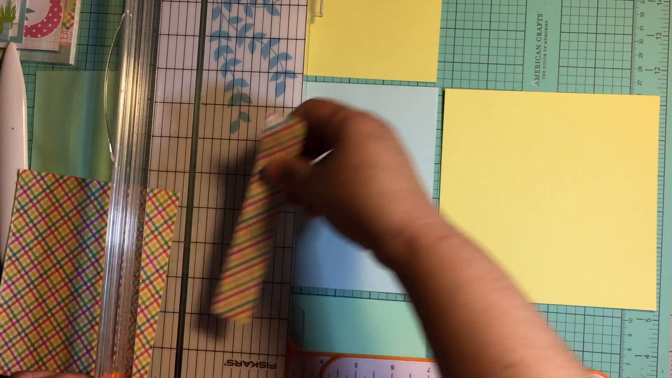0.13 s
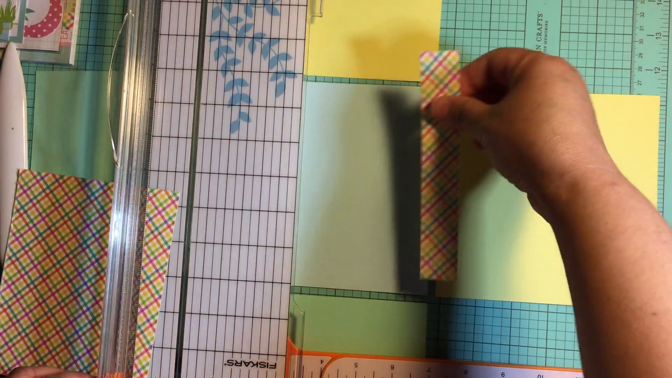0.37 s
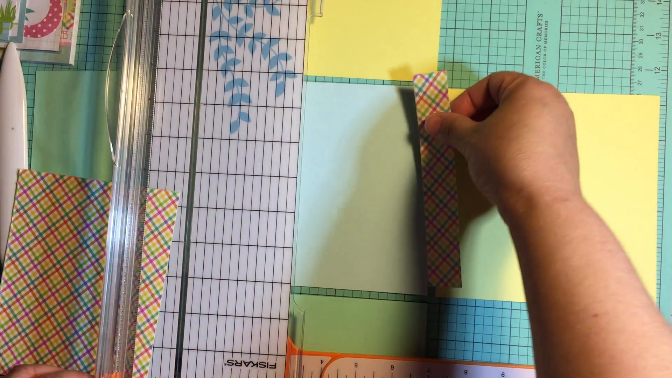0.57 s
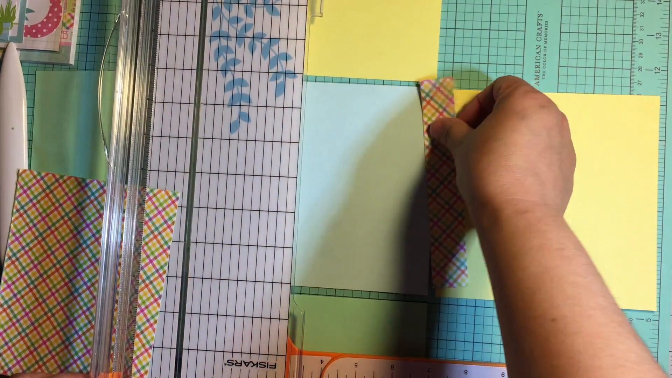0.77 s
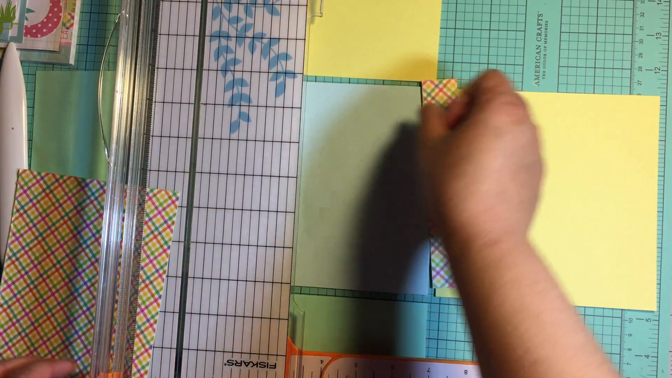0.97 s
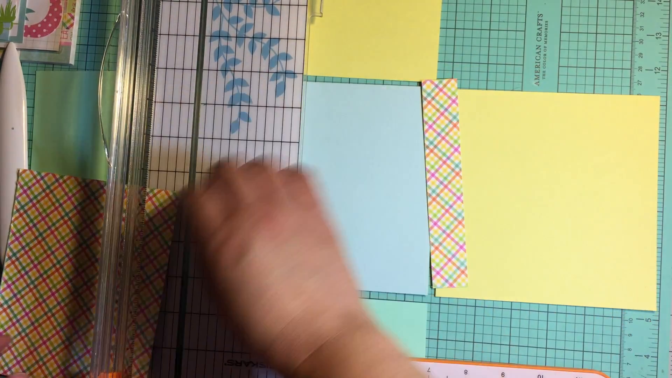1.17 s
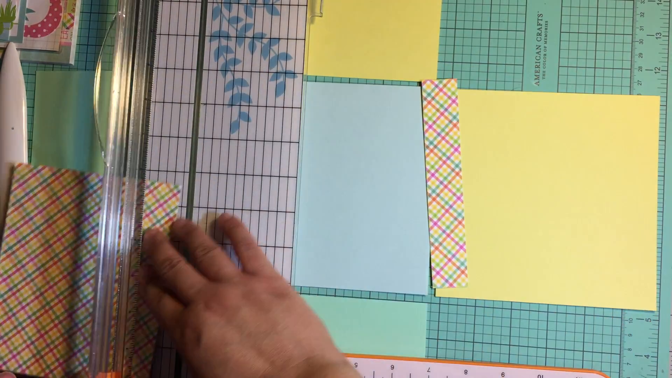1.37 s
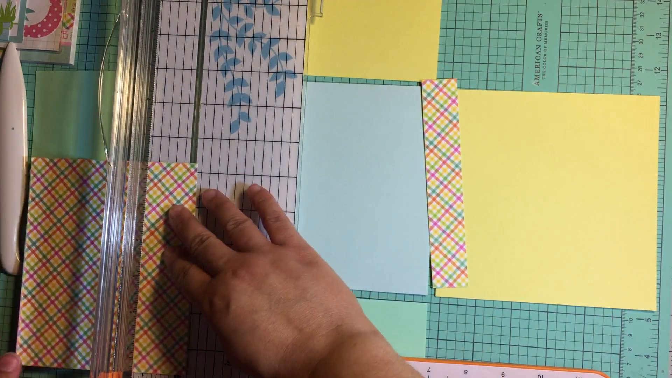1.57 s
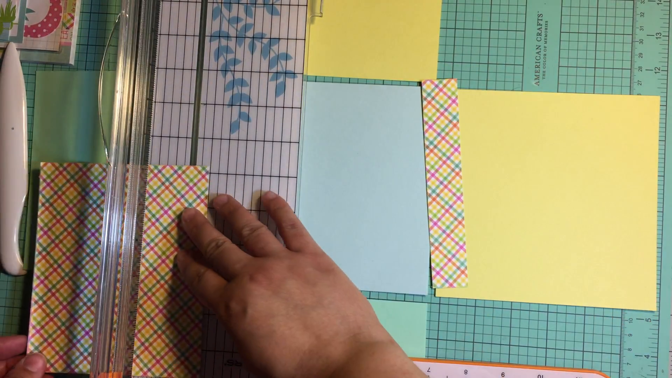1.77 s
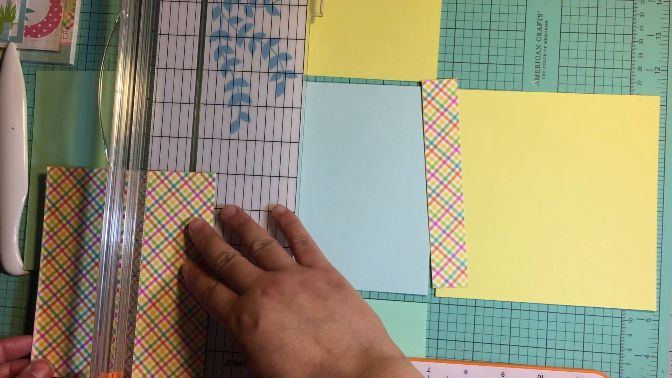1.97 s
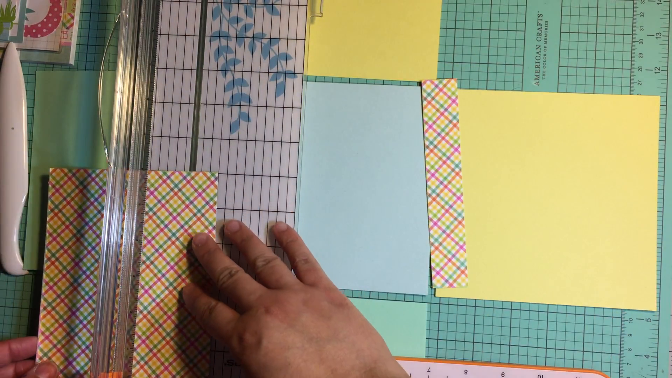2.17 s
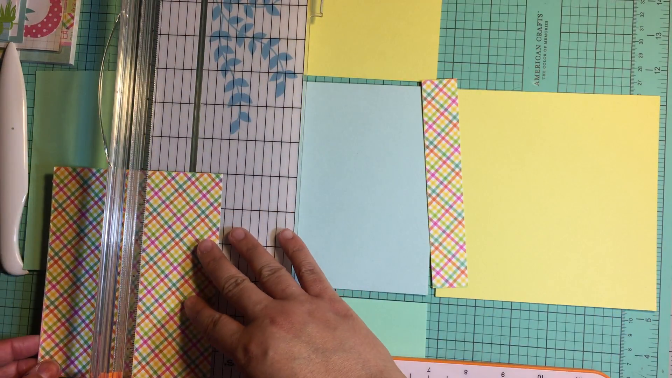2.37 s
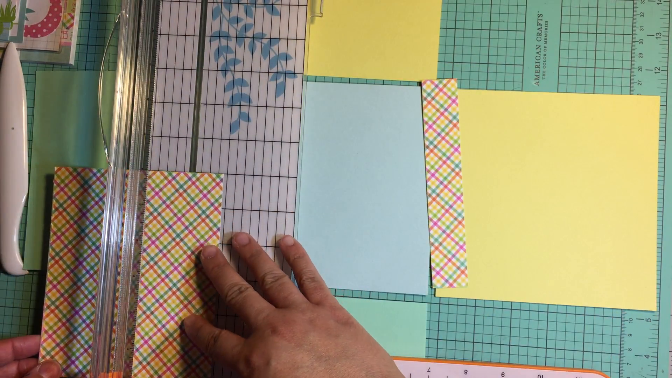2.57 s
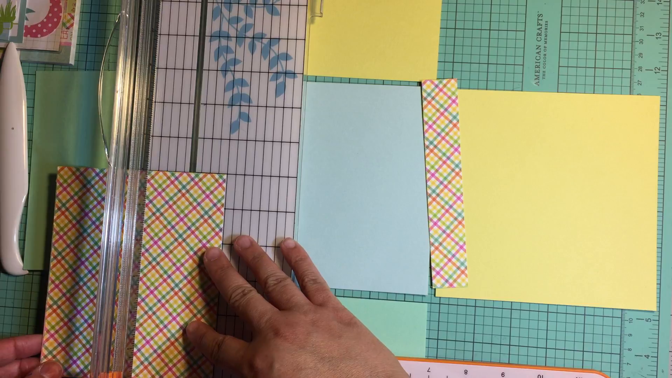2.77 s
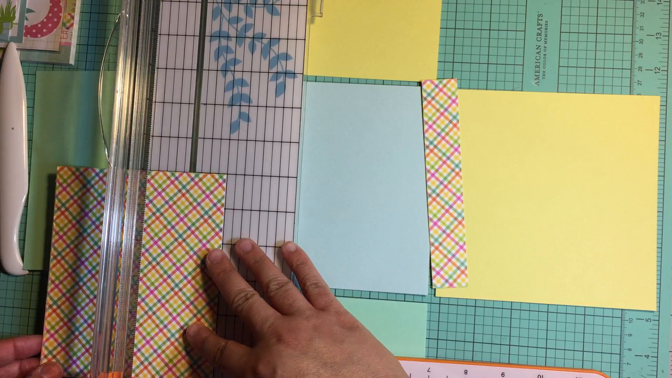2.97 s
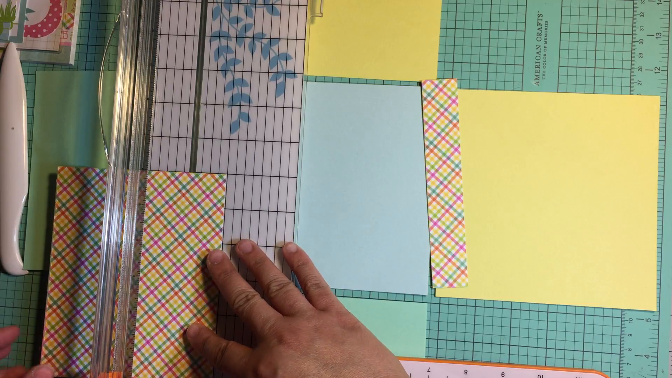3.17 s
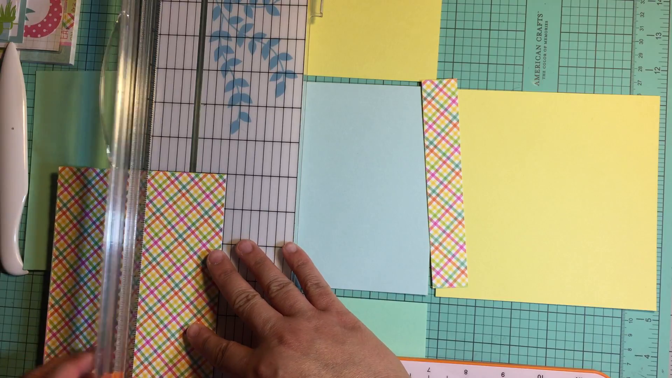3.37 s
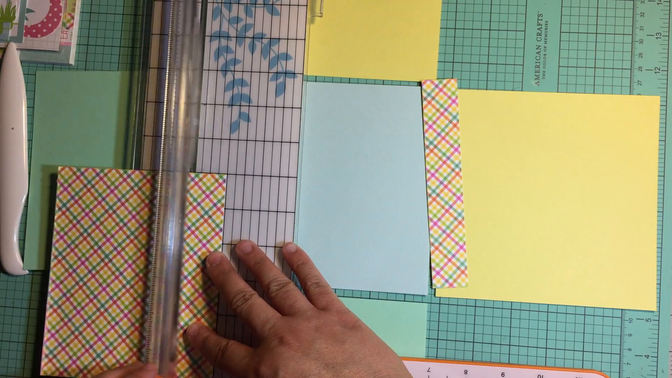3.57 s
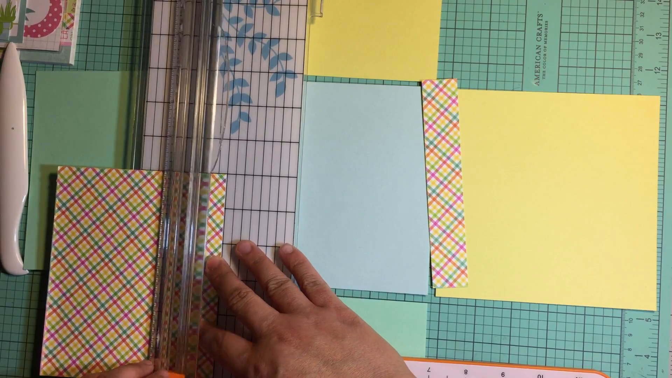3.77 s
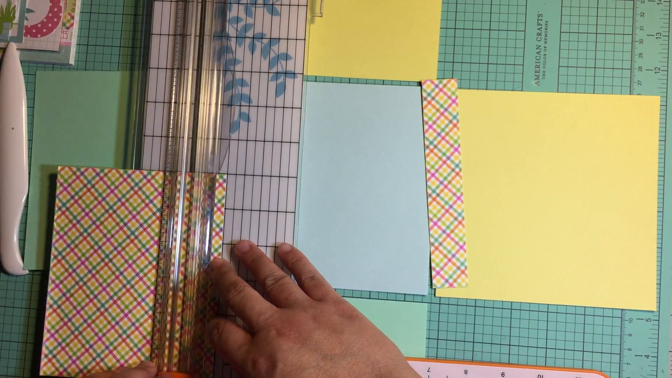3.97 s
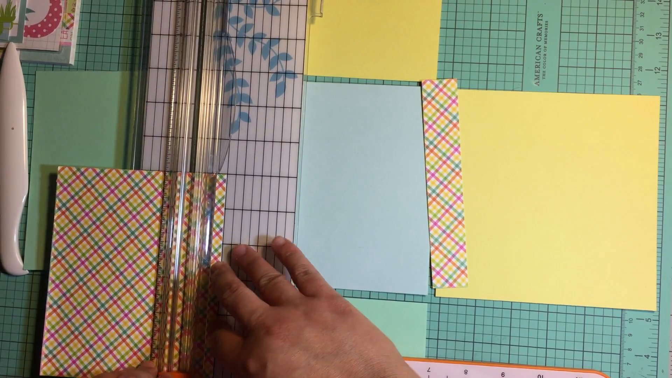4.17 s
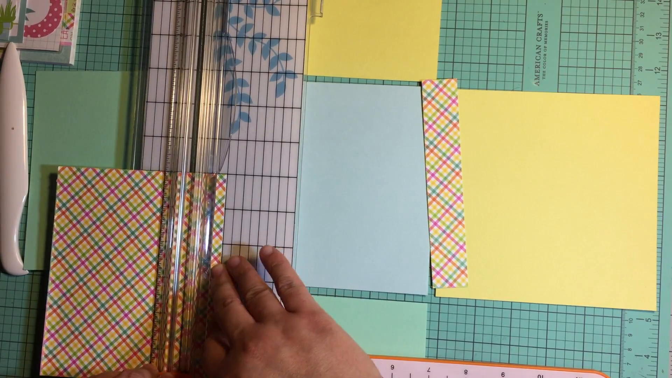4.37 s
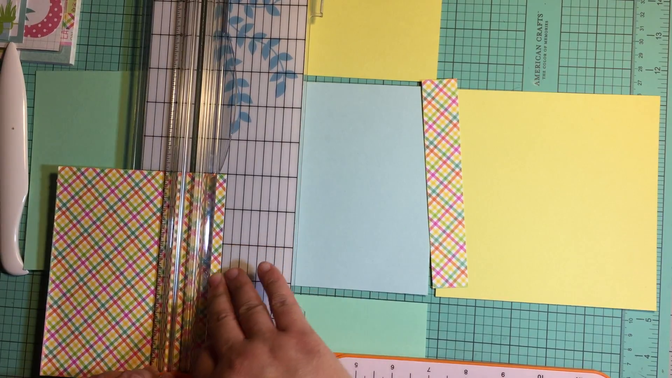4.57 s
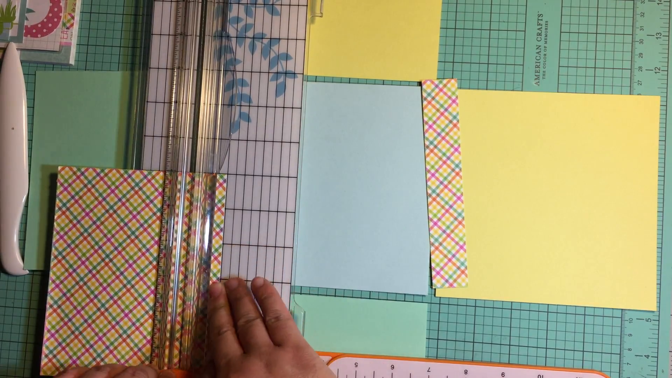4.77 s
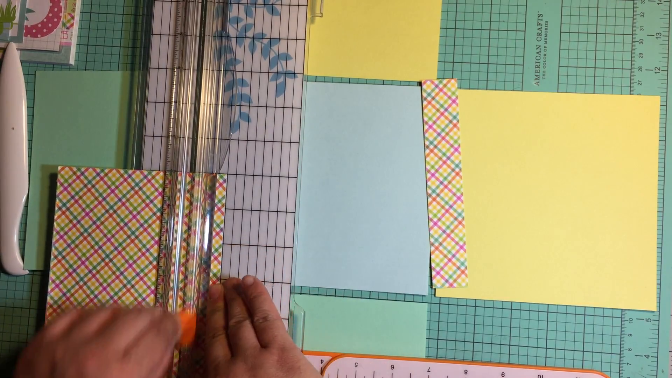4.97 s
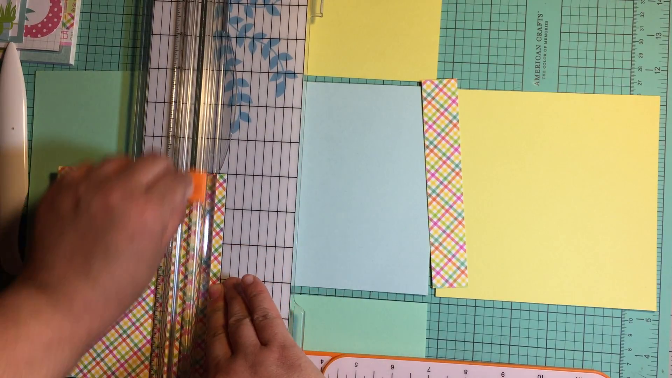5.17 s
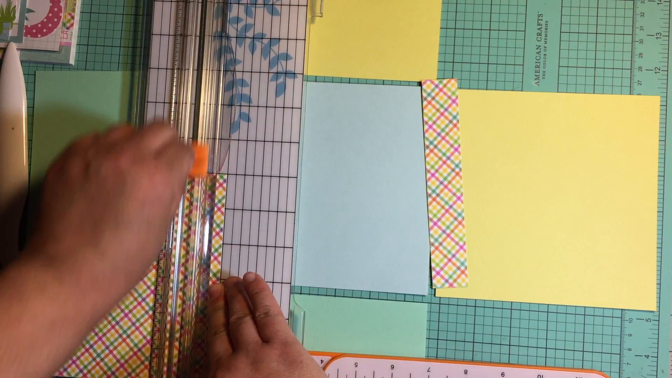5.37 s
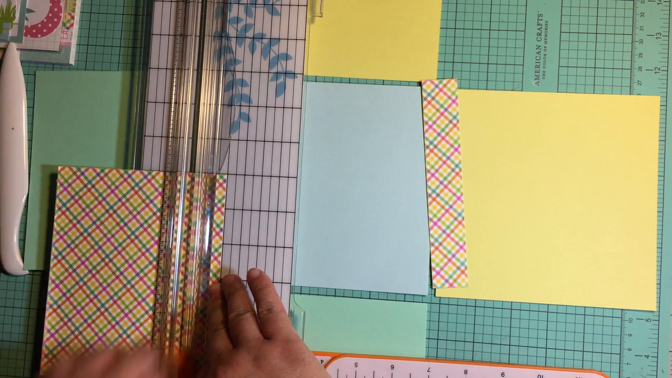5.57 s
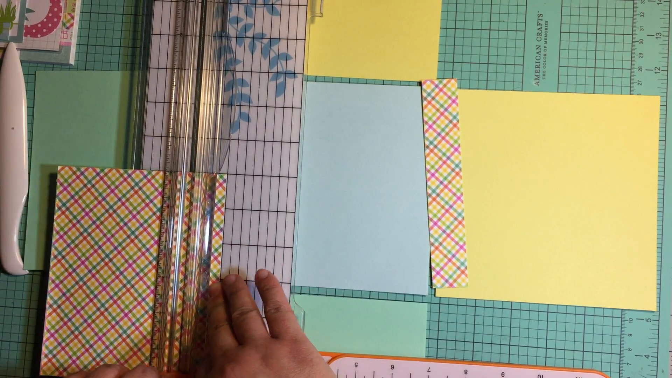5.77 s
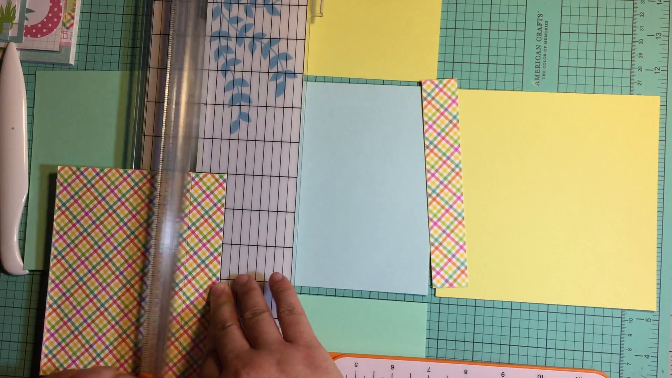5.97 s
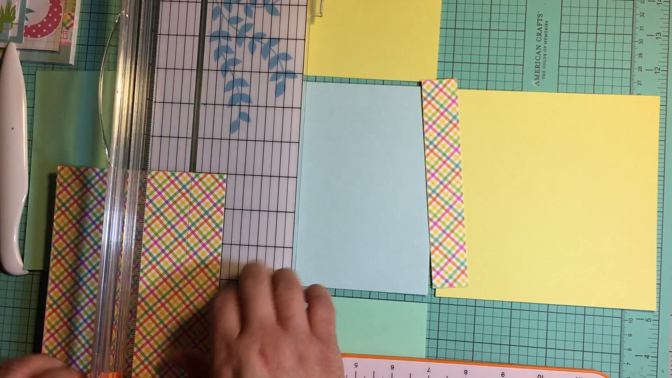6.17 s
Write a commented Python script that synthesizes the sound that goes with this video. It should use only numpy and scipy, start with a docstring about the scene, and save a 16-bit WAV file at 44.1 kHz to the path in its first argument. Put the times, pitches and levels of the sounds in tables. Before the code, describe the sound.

In a small, quiet room, card is handled close by, with light flicks and papery swishes. A sheet is dragged under a trimmer's rail with a hoarse rub and faint rustling. The plastic rail clicks, then comes down with a sharp clack and a tiny rattle. The sliding blade cuts with a short, gritty rasp and runs back more softly, followed by plastic knocks as the rail is raised.

```python
"""Trimming card on a rail trimmer

In a small room, a cut strip of card is picked up and laid down with a flick. The sheet is pushed under
the plastic rail, which clacks down on it. The blade carriage rasps through the card and slides back
more lightly, and the rail is lifted. Impacts excite the damped modes of card, plastic and desk;
sliding sounds are stick-slip friction, a dense train of clicks as paper fibres catch and let go."""
import sys
import numpy as np
from scipy import signal
from scipy.fft import rfft, irfft, next_fast_len
from scipy.io import wavfile
from scipy.ndimage import map_coordinates

SR = 44100
rng = np.random.default_rng(int(sys.argv[2]) if len(sys.argv) > 2 else 0)


def wrap_up_sound(samples):
    """Save the sound to the file named by the first command line argument, as 16-bit audio."""
    columns = np.atleast_2d(samples).T
    # keep every value between -1 and 1, then stretch to whole-number steps
    tamed = np.clip(columns, -1, 1)
    steps = np.round(tamed * 32767).astype(np.int16)
    wavfile.write(sys.argv[1], SR, steps)


N = 274787
T = np.arange(N) / SR


def from_db(db):
    """Amplitude ratio of a level in decibels."""
    return 10 ** (np.asarray(db) / 20)


def unit_rms(x):
    """Normalisation to unit mean power."""
    return x / np.sqrt(np.mean(x ** 2) + 1e-20)


def band(x, low_hz, high_hz, order=2):
    """Causal Butterworth band-pass filtering."""
    return signal.sosfilt(signal.butter(order, [low_hz, high_hz], "band", fs=SR, output="sos"), x)


def coloured(x, spectrum):
    """Spectral shaping by an envelope interpolated over log frequency; rms 1."""
    hz, db = np.transpose(spectrum)
    size = next_fast_len(N)
    log_hz = np.log(np.arange(size // 2 + 1) * SR / size + 1)
    gain = from_db(np.interp(log_hz, np.log(hz), db, left=-120))
    return unit_rms(irfft(rfft(x, size) * gain, size)[:N])


def drift(rate_hz):
    """Random modulation: straight lines join values drawn at the given rate; rms 1."""
    knots = np.arange(0, T[-1] + 1, 1 / rate_hz)
    return unit_rms(np.interp(T, knots, rng.standard_normal(len(knots))))


def resonance(x, hz, width_hz):
    """Forced response of a two-pole resonator with unit peak gain."""
    radius = np.exp(-np.pi * width_hz / SR)
    feedback = [1, -2 * radius * np.cos(2 * np.pi * hz / SR), radius ** 2]
    return signal.lfilter(np.array([1, 0, -1]) * (1 - radius ** 2) / 2, feedback, x)


def ring(modes, t, scatter_db):
    """Free vibration: a sum of damped modes, weighted anew as each blow lands elsewhere."""
    hz, db, t60 = np.transpose(modes)[:, :, None]
    weight = from_db(db + scatter_db * rng.standard_normal(hz.shape)) * rng.choice([-1, 1], hz.shape)
    return np.sum(weight * from_db(-60 * t / t60) * np.sin(2 * np.pi * hz * t), axis=0)


# Spectrum of the still air: (frequency [Hz], level [dB])
AIR_SPECTRUM = [(15, -59.5), (25, -26.5), (74, 0), (129, -9), (183, -9.5), (222, -12.5), (300, -13),
                (404, -13.5), (451, -18.5), (698, -18.5), (845, -21.5), (917, -19.5), (2080, -23),
                (2810, -23.5), (17000, -34.5)]
def background(air_db=-68.5, hum_hz=118, hum_db=-74):
    """Noise floor: broadband air noise and a faint pure tone of mains hum."""
    air = from_db(air_db) * coloured(rng.standard_normal(N), AIR_SPECTRUM)
    return air + from_db(hum_db) * np.sqrt(2) * np.sin(2 * np.pi * hum_hz * T)


# Modes of the desk: (frequency [Hz], level [dB], T60 [s])
DESK_MODES = [(70, -20.5, 0.11), (123, 1, .16), (222, -4.5, 0.084), (300, -8, 0.13)]
def impacts(contacts, modes, spectrum, ring_db, blur, blur_s, thud_boost_db=0):
    """Impact excitation: each contact chatters, cracks, rings the struck body and shakes the desk."""
    out, t = np.zeros(N + SR), np.arange(SR // 4) / SR
    bands_hz = [(280, 1900), (1900, 4600), (4600, 19000)]   # body, snap, tick
    noise = np.tile(coloured(rng.standard_normal(N), spectrum), 2)
    for time_s, contact_ms, *levels_db, thud_db in contacts:
        start, contact_s = round(time_s * SR), contact_ms / 1000
        span = slice(start, start + len(t))
        rise = 1 - np.exp(-(2.5 * t / contact_s) ** 2)
        touch = rise * np.exp(-(t / contact_s) ** 2)
        force = .12 * rng.standard_normal(len(t)) * touch
        force[0] += 1
        detune = 1 + .035 * rng.standard_normal()   # the hands load the piece differently each time
        ringing = rise * signal.fftconvolve(force, ring(modes, detune * t, scatter_db=2.5))[:len(t)]
        # countless damped modes blur into a crack that barely outlasts the contact
        crack = noise[span] * (touch + blur * rise * np.exp(-t / blur_s))
        sound = unit_rms(crack) + from_db(ring_db) * unit_rms(ringing)
        parts = [band(sound, *edges, order=3) for edges in bands_hz]
        thud = ring(DESK_MODES, t, scatter_db=-1)
        for part, db in zip(parts + [thud], levels_db + [thud_db + thud_boost_db]):
            # a level is the energy of the blow spread over 10 ms
            out[span] += from_db(db) * part / np.sqrt(np.sum(part ** 2) * 100 / SR)
    return out[:N]


# Flicks of card: (time [s], contact [ms], body [dB], snap [dB], tick [dB], desk thud [dB])
CARD_FLICKS = [(0.0005, 2.5, -35, -33.5, -34.5, -49), (0.1255, 2, -80, -59, -47, -78),
               (0.3235, 4, -51.5, -55, -54, -80), (0.8555, 3.5, -48, -31, -39.5, -57),
               (0.8788, 1.33, -40.5, -32, -27.5, -55), (0.8837, 1.1, -38.5, -41, -27.5, -49),
               (0.9725, 6.5, -59.5, -61, -80, -73), (5.939, 5.1, -52, -59.5, -53, -80),
               (6.0355, 3.4, -78, -75, -54.5, -83)]
# Modes of the strip: (frequency [Hz], level [dB], T60 [s])
CARD_MODES = [(356, -11.5, .04), (600, -8.5, 0.026), (1010, -6, .03), (1270, -6.5, .025),
              (1777, -6.5, 0.013), (2700, -2.5, .02), (3360, -12.5, .035)]
# Spectrum of a contact on card: (frequency [Hz], level [dB])
FLICK_SPECTRUM = [(200, 0), (450, -20.5), (900, -16), (1800, 4), (2200, -8), (2700, 6.5), (3300, 6.5),
                  (4300, -7), (5600, -1.5), (8800, -0.5), (10400, -11), (12000, -9), (17000, -19)]
def card_flicks():
    """Heavy damping: stiff card gives a sharp crack and hardly rings."""
    return impacts(CARD_FLICKS, CARD_MODES, FLICK_SPECTRUM, ring_db=-11, blur=.1, blur_s=.007)


def stick_slip(clicks_per_s, spread_db, judder_db, judder_hz):
    """Stick-slip friction: fibres catch and let go in random clicks whose level judders."""
    caught = rng.random(N) < clicks_per_s / SR
    polarity = rng.choice([-1, 1], N)
    strength = from_db(spread_db * np.clip(rng.standard_normal(N), -2, 2))
    return unit_rms(caught * polarity * strength) * from_db(judder_db * drift(judder_hz))


def swell(peak_s, swell_s):
    """Amplitude envelope: a 20 dB rise over swell_s, a round top, a slower fade."""
    fade_s = 1.4 * swell_s
    distance = np.maximum((peak_s - T) / swell_s, (T - peak_s) / fade_s)
    return from_db(-20 * distance ** 1.4) * (distance < 4)


def swell_gains(swells):
    """Incoherent addition: the rub and hiss gains of overlapping swells sum in power."""
    return np.sqrt(sum((from_db(levels_db)[:, None] * swell(peak_s, swell_s)) ** 2
                       for peak_s, swell_s, *levels_db in swells))


# Swishes of the strip: (peak time [s], swell [s], rub [dB], hiss [dB])
STRIP_SWISHES = [(0.066, .075, -59, -49.5), (0.122, .045, -59, -45.5), (0.234, .1, -69, -55),
                 (0.337, .06, -61, -61), (0.427, .085, -65.5, -63), (0.6, .08, -69.5, -72.5),
                 (0.77, .12, -69, -73.5), (0.85, .04, -53, -58), (0.895, .035, -53, -57)]
# Friction spectra of its face and edge: (frequency [Hz], level [dB])
STRIP_FACE = [(600, -26.5), (1250, -11), (1850, -3), (2100, -9.5), (3000, -6), (3350, -0.5), (3750, -5.5),
              (5000, -16), (6000, -23.5)]
STRIP_EDGE = [(4000, -20), (5400, -8), (7200, 0.5), (9200, 4.5), (10400, -5), (11600, -1.5), (17000, -15)]
def strip_swishes():
    """Sliding friction on paper: the face of the loose strip rubs and its edge hisses."""
    rub, hiss = swell_gains(STRIP_SWISHES)
    friction = stick_slip(clicks_per_s=14000, spread_db=3, judder_db=1.2, judder_hz=90)
    return rub * coloured(friction, STRIP_FACE) + hiss * coloured(friction, STRIP_EDGE)


# Soft knocks of fingers and rail: (time [s], contact [ms], body [dB], brightness [dB], desk thud [dB])
SOFT_KNOCKS = [(1.384, 12, -50, -16, -58), (1.402, 12, -46, -7, -60), (1.419, 11, -43.5, -15, -54),
               (1.513, 2.9, -56, 7, -53), (1.701, 8, -53.5, -28, -80), (2.04, 14, -54, -11, -74),
               (3.456, 5.7, -61, -18, -80), (3.47, 11, -60, -25, -76), (3.818, 5, -57.5, -26, -58),
               (3.936, 5.1, -54, -12, -55), (3.971, 5.5, -46.5, -19, -44.5), (4.003, 2.5, -50.5, -32, -52),
               (4.042, 7.5, -54, -28, -62), (4.532, 7.5, -49.5, -50, -53), (4.798, 7.6, -50.5, -20, -48),
               (5.711, 7, -45, -14, -48), (5.891, 8, -49, -32, -57), (5.906, 14, -49, -28, -55),
               (5.948, 2.4, -43.5, -30, -58), (6.217, 5.6, -49, -19, -57), (6.226, 2.7, -46.5, -32, -53.5)]
# Hard clacks on the base: (time [s], contact [ms], body [dB], snap [dB], tick [dB], desk thud [dB])
HARD_CLACKS = [(3.7435, 4.5, -44.5, -47, -47, -68.5), (3.7485, 5.8, -42.5, -36, -37.5, -55),
               (3.76, 2.5, -42, -40, -56, -46), (4.0822, 1.2, -31, -25.5, -33.5, -44),
               (4.0933, 0.8, -50, -52, -37, -45), (5.7215, 4, -35, -42, -54, -43),
               (5.972, 6, -47, -44.5, -61.5, -44.5)]
# Modes of the trimmer: (frequency [Hz], level [dB], T60 [s])
TRIMMER_MODES = [(810, -6, .035), (947, -10, .15), (1030, -3, .03), (1170, -4, .035), (1330, -4, .03),
                 (1720, -6, .03), (2466, -10, .04), (3171, -11, .035), (3680, -9, .035), (3930, -10, .04),
                 (5250, -18, .03), (7200, -15, .025)]
# Spectrum of a contact on plastic: (frequency [Hz], level [dB])
PLASTIC_SPECTRUM = [(200, -16), (430, -24), (700, -9), (1200, 2), (1900, -10), (2800, -6), (3800, 1),
                    (4700, -11.5), (6300, -9), (7300, -3), (8300, -11.5), (11000, -19), (17000, -25)]
def trimmer_knocks(bounce_start_s=4.102, bounce_gap_s=.0198, bounce_loss_db=4.5):
    """Inelastic collision: blows ring the trimmer, and the shut rail bounces ever more weakly."""
    # bounces have the columns of the soft knocks
    bounces = [(bounce_start_s + k * bounce_gap_s, 2.2, -42 - k * bounce_loss_db, -16, -72)
               for k in range(4)]
    contacts = list(HARD_CLACKS)
    for time_s, contact_ms, body_db, bright_db, thud_db in list(SOFT_KNOCKS) + bounces:
        snap_db, tick_db = body_db + 2 + .6 * bright_db, body_db + bright_db
        contacts.append((time_s, contact_ms, body_db, snap_db, tick_db, thud_db))
    return impacts(contacts, TRIMMER_MODES, PLASTIC_SPECTRUM, ring_db=-6, blur=.16, blur_s=.005)


# Swells of sheet friction and, at 4.075 s, a brief rush of noise leading into the rail's clack:
# (peak time [s], swell [s], rub [dB], hiss [dB])
RUSTLE_SWELLS = [(1.517, 0.117, -56.5, -61.5), (1.622, 0.073, -57.5, -60.5), (1.717, 0.059, -66.5, -72.0),
                 (1.892, 0.19, -66.0, -70.0), (2.034, 0.068, -66.0, -69.5), (2.219, 0.149, -67.0, -68.5),
                 (2.544, 0.301, -73.0, -74.5), (2.736, 0.339, -77.0, -88.0), (3.186, 0.071, -70.0, -87.5),
                 (3.558, 0.081, -72.0, -66.5), (3.696, 0.029, -69.0, -75.0), (3.848, 0.146, -65.5, -71.5),
                 (3.933, 0.03, -66.0, -60.5), (3.988, 0.07, -60.5, -82.5), (4.075, 0.022, -48.0, -48.0),
                 (4.129, 0.066, -58.5, -52.5), (4.646, 0.189, -74.5, -84.0), (4.792, 0.037, -62.5, -70.0),
                 (5.877, 0.068, -69.0, -72.5), (6.017, 0.027, -62.0, -76.5), (6.138, 0.038, -69.0, -80.5),
                 (6.217, 0.039, -60.0, -70.5)]
# Spectra of the sheet's face, its edge and the shaken desk: (frequency [Hz], level [dB])
SHEET_FACE = [(450, -14), (800, -13), (1040, 2.5), (1350, -11), (1750, -7.5), (2050, -1.5), (3100, -8.5),
              (3800, -9), (5000, -37.5), (6000, -26.5)]
SHEET_EDGE = [(4000, -5), (5400, -7), (6500, -4), (7600, -6.5), (9300, -4), (10400, -16.5), (12000, -7),
              (17000, -23)]
DESK_SHAKE = [(30, -11), (70, 4), (122, -5.5), (170, -5.5), (290, -9.5), (450, -17), (700, -36)]
def sheet_rustle():
    """Sliding friction on plastic: the sheet rubs and hisses as the pressing hands shake the desk."""
    rub, hiss = swell_gains(RUSTLE_SWELLS)
    friction = stick_slip(clicks_per_s=5000, spread_db=4, judder_db=2.2, judder_hz=90)
    shake = from_db(-5.5) * coloured(rng.standard_normal(N), DESK_SHAKE)
    return rub * (coloured(friction, SHEET_FACE) + shake) + hiss * coloured(friction, SHEET_EDGE)


def wavering_tone(hz, width_hz):
    """Narrow-band noise: random quadrature modulation of a moving pitch."""
    phase = 2 * np.pi * np.cumsum(hz) / SR
    return unit_rms(drift(width_hz) * np.cos(phase) + drift(width_hz) * np.sin(phase))


# Drags under the rail: (peak time [s], swell [s], fundamental [Hz], rise [Hz/s], level [dB])
SHEET_DRAGS = [(1.62, .13, 483, 330, -61.5), (1.712, .035, 545, 1100, -60.5), (1.95, .17, 497, 400, -65)]
def sheet_song():
    """Friction-induced vibration: the dragged sheet sings a hoarse, rising note on harmonics 2 to 5."""
    song = np.zeros(N)
    for peak_s, swell_s, hz, rise_hz_per_s, db in SHEET_DRAGS:
        pitch_hz = hz + rise_hz_per_s * (T - peak_s)
        note = sum(wavering_tone(k * pitch_hz, width_hz=170) / np.sqrt(k) for k in range(2, 6))
        song += from_db(db) * swell(peak_s, swell_s) * unit_rms(note)
    return song


# Carriage clunks: (time [s], contact [ms], body [dB], snap [dB], tick [dB], thud before boost [dB])
ROCKING_CLUNKS = [(4.962, 4, -47, -51, -59, -54), (5.306, 3, -51, -66, -55, -36),
                  (5.4165, 5, -37.5, -57, -82, -60), (5.449, 5, -41, -44, -57, -50.5)]
# Modes of the carriage: (frequency [Hz], level [dB], T60 [s])
CARRIAGE_MODES = [(590, 0.5, 0.033), (675, 0, 0.038), (810, -2.5, 0.025), (1210, -5, 0.03),
                  (1530, -0.5, 0.017), (3250, -13, 0.037), (4060, -18, 0.025)]
def carriage_clunks():
    """Mechanical play: the hollow carriage rocks in its slot as it bites, stops and turns back."""
    return impacts(ROCKING_CLUNKS, CARRIAGE_MODES, PLASTIC_SPECTRUM,
                   ring_db=1, blur=.13, blur_s=.0046, thud_boost_db=1.5)


def stroke_gains(start_s, fastest_s, stop_s, bite_db, slow_db, rumble_db, rail_db, rasp_db):
    """Friction noise follows speed: a run-up, a jump at the bite, a swell and a short coast."""
    run_up_db_per_s, coast_db_per_s = 200, 250
    speed_db = -slow_db * ((np.clip(T, start_s, stop_s) - fastest_s) / (fastest_s - start_s)) ** 2
    run_up_db = (T < start_s) * (-bite_db - run_up_db_per_s * (start_s - T))
    coast_db = (T > stop_s) * (-13.5 - coast_db_per_s * (T - stop_s))
    free_db = np.maximum(run_up_db + coast_db, -100)
    return (from_db(rumble_db + 1.8 * speed_db + free_db),
            from_db(rail_db + .55 * speed_db + free_db),
            from_db(rasp_db + speed_db + free_db))


# Resonances of the rail: (frequency [Hz], bandwidth [Hz], level [dB])
RAIL_RESONANCES = [(697, 70, 8), (762, 120, 3), (1100, 72, -5.5), (1420, 160, -3.5), (2600, 64, -27),
                   (3225, 120, 1), (3890, 290, -4), (5140, 330, -8), (5610, 130, -4), (6190, 200, -5.5),
                   (8660, 110, -6)]
# Reflection of the moving blade off the desk: (time [s], delay [ms])
DESK_ECHO = [(4.9, 0.92), (5.31, 0.682), (5.45, 0.62), (5.73, 1.05)]
def carriage_stroke(friction, gains, spectrum, ring_db, grit_db):
    """Forced vibration: the friction of the carriage rasps, rings the rail and rumbles in the desk."""
    rumble_gain, rail_gain, rasp_gain = gains
    # each resonance swells and fades as the carriage passes its nodes
    rail = sum(from_db(db + 2.5 * drift(30)) * resonance(friction, hz, width_hz)
               for hz, width_hz, db in RAIL_RESONANCES)
    scrape = coloured(friction, spectrum) + from_db(ring_db) * unit_rms(rail)
    # interference with the echo makes a sweeping comb filter
    delay_ms = np.interp(T, *np.transpose(DESK_ECHO))
    swept = scrape + .25 * map_coordinates(scrape, [np.arange(N) - delay_ms * SR / 1000], order=3)
    # clumps of fibres tear at changing pitches
    grit = sum(drift(120) * resonance(swept, hz, hz / 8) for hz in np.geomspace(2300, 14000, 12))
    rasp = swept + (from_db(grit_db) - 1) * grit
    rumble = sum(gain * resonance(friction, hz, width_hz)
                 for hz, width_hz, gain in [(122, 16, 1), (228, 74, .45), (295, 40, .65)])
    return (rumble_gain * unit_rms(band(rumble, 50, 330))
            + rail_gain * unit_rms(band(scrape, 440, 2000, order=4))
            + rasp_gain * unit_rms(band(rasp, 2050, 19000, order=4)))


# Friction spectrum of the cut: (frequency [Hz], level [dB])
CUT_SPECTRUM = [(240, -46), (400, -16), (490, -39), (621, 1), (715, 1.5), (948, -9), (1490, -3.5),
                (1980, -10.5), (3890, -11), (4480, -12), (6130, -12), (8940, -17.5), (10600, -13.5),
                (17000, -24.5)]
def blade_cut():
    """Fracture: the blade tears through the fibres on its way up the rail."""
    gains = stroke_gains(start_s=4.962, fastest_s=5.22, stop_s=5.306, bite_db=6.5, slow_db=6.3,
                         rumble_db=-44.5, rail_db=-40.8, rasp_db=-38.1)
    friction = stick_slip(clicks_per_s=10000, spread_db=3.5, judder_db=.8, judder_hz=170)
    return carriage_stroke(friction, gains, CUT_SPECTRUM, ring_db=-5, grit_db=3)


def blade_whistle(peak_s=5.235, hz=10300, rise_hz_per_s=8000, db=-45.5):
    """Frequency glide: the cutting blade whistles in a thin, rising band of noise."""
    pitch_hz = hz + rise_hz_per_s * (T - peak_s)
    return from_db(db) * swell(peak_s, swell_s=.06) * wavering_tone(pitch_hz, width_hz=500)


# Friction spectrum of the return: (frequency [Hz], level [dB])
RETURN_SPECTRUM = [(240, -48), (400, -26), (556, -16.5), (704, -2.5), (810, -3.5), (863, -16), (948, -4.5),
                   (1260, -5.5), (1670, -10), (2140, -15.5), (2840, -6.5), (4770, -10.5), (5580, -11),
                   (17000, -18.5)]
def blade_return():
    """Light sliding friction: the blade runs back in its own slit."""
    gains = stroke_gains(start_s=5.515, fastest_s=5.61, stop_s=5.72, bite_db=0, slow_db=3,
                         rumble_db=-51, rail_db=-46, rasp_db=-45.5)
    friction = stick_slip(clicks_per_s=14000, spread_db=3, judder_db=.8, judder_hz=170)
    return carriage_stroke(friction, gains, RETURN_SPECTRUM, ring_db=-9, grit_db=1.8)


def room(x, t60_s=.2, wall_cutoff_hz=8000):
    """Reverberation: dense reflections arrive after 4 ms and decay exponentially."""
    t = np.arange(SR // 2) / SR
    reflections = band(rng.standard_normal(len(t)), 150, wall_cutoff_hz, order=1)
    tail = reflections * from_db(-60 * t / t60_s) * (t > .004)
    return signal.fftconvolve(x, tail / np.sqrt(np.sum(tail ** 2)))[:N]


def scene():
    """Superposition: the direct sound of the handling, its reverberation and the noise floor."""
    handling = card_flicks() + strip_swishes() + trimmer_knocks() + sheet_rustle() + sheet_song()
    handling += carriage_clunks() + blade_cut() + blade_whistle() + blade_return()
    return (handling + from_db(-16.5) * room(handling) + background())[None]


def record(dry):
    """Band limiting: a steep elliptic low-pass removes the highest treble."""
    cutoff_hz = 17300
    return signal.sosfilt(signal.ellip(10, .2, 70, cutoff_hz, fs=SR, output="sos"), dry)


dry = scene()
out = record(dry)
wrap_up_sound(out)
```